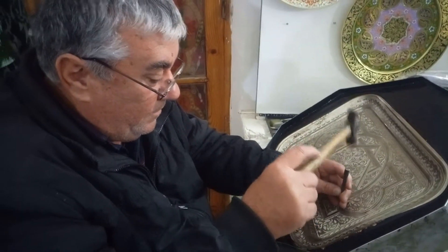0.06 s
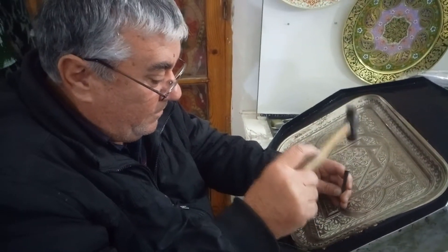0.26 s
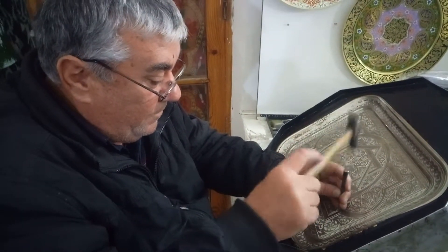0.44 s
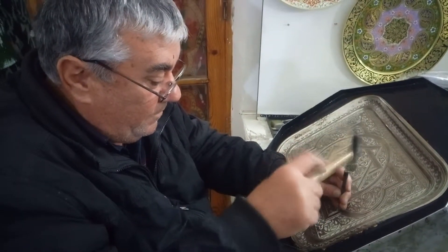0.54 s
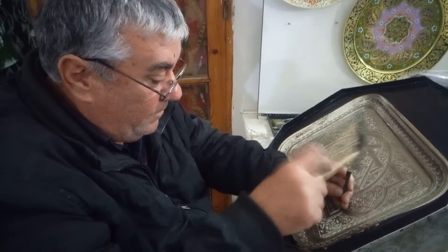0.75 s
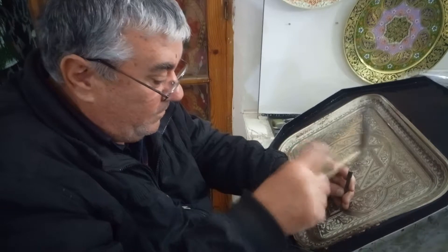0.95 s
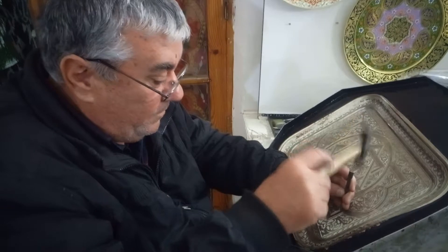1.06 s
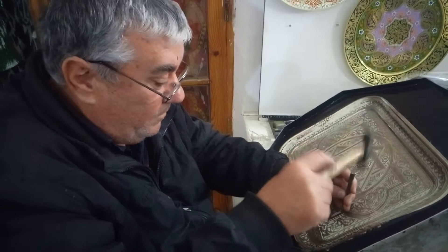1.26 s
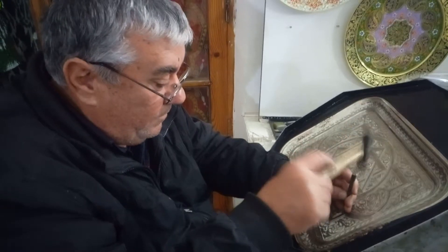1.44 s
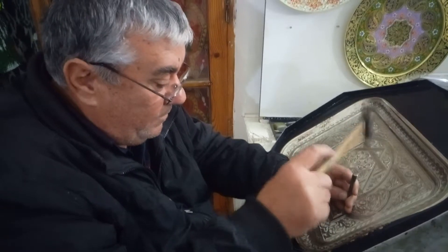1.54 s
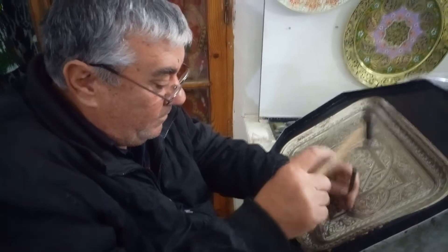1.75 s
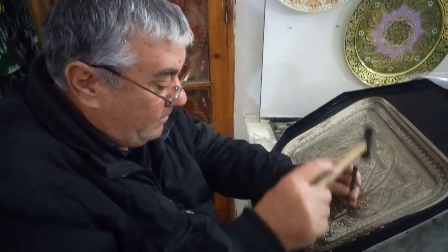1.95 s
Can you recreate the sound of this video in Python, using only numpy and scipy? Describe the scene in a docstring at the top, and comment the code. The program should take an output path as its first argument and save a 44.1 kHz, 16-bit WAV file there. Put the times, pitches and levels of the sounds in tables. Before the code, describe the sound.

A small hammer taps a punch against a metal tray seven times in a reverberant room.

```python
"""A reverberant room with a low rumble, one microphone close to a metal tray.
A small hammer taps a steel punch against the tray seven times, a little under five taps a second.
Each tap is a bright clink of steel and a short, falling clonk as the sheet bends; the tray thuds
softly as it is handled. The room answers late, with a long tail in which faint tones linger, and the
recorder's look-ahead limiter ducks that tail around every tap."""
import sys
import numpy as np
from scipy import signal
from scipy.fft import rfft, irfft
from scipy.io import wavfile
from scipy.ndimage import uniform_filter1d, minimum_filter1d

SR = 44100
rng = np.random.default_rng(int(sys.argv[2]) if len(sys.argv) > 2 else 0)


def persist_wave(psi):
    """Save psi, clipped to +-1, as 16-bit WAV."""
    counts = np.round(np.clip(psi, -1, 1) * 32767).astype(np.int16)
    wavfile.write(sys.argv[1], SR, np.atleast_2d(counts).T)


N = 88200

# The room's rumble and hiss. Each row: frequency in Hz, relative density in dB.
ROOM_TONE_SPECTRUM = [(18, -31.5), (30, 3.5), (106, 1.5), (194, -6), (239, -18.5), (287, -7.5), (394, -19),
                      (437, -13), (600, -20), (937, -17.5), (1160, -33), (1760, -32.5), (2610, -21.5),
                      (3870, -48), (6210, -45.5), (8520, -60.5), (16000, -59.5)]
# The hammer taps. Each row: start in seconds, strength in dB, then trims in dB for the clonk, the
# sheet's overtones, the steel modes and the punch's ping, and the ping's tilt in dB per kHz.
HAMMER_TAPS = [(0.2152, -5.5, -5.5, -4, 2.5, -0.5, -17), (0.4209, -4, 0, -5.5, 2, 2, 15.5),
               (0.6404, -1.5, 2, 2, 2, 6, 4), (0.856, 0, 1, -1.5, -1.5, 4.5, 3),
               (1.0715, -0.5, 0.5, -1.5, 0.5, 0.5, -8), (1.2821, -2, 1.5, 3, 3, -1.5, -5),
               (1.4813, -2, 1, 4.5, 0, -0.5, 7)]
# The crack of contact. Each row: frequency in Hz, relative density in dB.
CRACK_SPECTRUM = [(40, -31.5), (90, 10), (150, 8), (260, 5), (480, 4), (1000, 7), (1900, -5.5),
                  (2800, -1.5), (4200, -7), (6200, -1), (8200, -2.5), (10800, -12.5), (13000, -3),
                  (16000, -7.5)]
# The clank of a loosely seated punch. Each row: frequency in Hz, level in dB, t60 in seconds.
CLANK_MODES = [(2330, -24, .008), (4960, -24, .006), (5450, -23, .005), (6250, -24, .005)]
# The punch's very high ping. Each row: frequency in Hz, level in dB, decay time in seconds.
PING_MODES = [(14670, -10, 0.0018), (15360, -11, 0.00073), (15730, -12.5, 0.00083)]
# The clink of hammer and punch. Each row: frequency in Hz, level in dB, t60 in seconds.
STEEL_MODES = [(2238, -25.5, 0.045), (5710, -13, 0.037), (5890, -20.5, 0.022), (6440, -28, .03),
               (7030, -22, .03), (7350, -19.5, 0.023), (7960, -26.5, .03), (7940, -30, .03)]
# The sheet's short overtones. Each row: frequency in Hz, level in dB, t60 in seconds.
SHEET_OVERTONES = [(152, -34.5, 0.04), (334, -22, 0.048), (698, -21.5, 0.071), (1020, -34.5, 0.014),
                   (1489, -14, 0.026), (1596, -36, 0.047), (2710, -27.5, .04), (3081, -18, 0.044),
                   (3670, -33.5, .04)]
# Faint low and middle tones that linger in the room's tail. Each row: frequency in Hz, level in dB.
ROOM_RING_MODES = [(150, -33), (347, -36), (535, -44), (650, -33.5), (686, -40.5), (808, -33), (836, -32),
                   (906, -31.5), (954, -31), (1043, -35.5), (1176, -38.5)]
# The room's distinct echoes. Each row: delay in seconds, level in dB, low and high band edge in Hz.
ROOM_ECHOES = [(.0118, -15, 500, 1300), (.0205, -12, 500, 1300), (.0145, -20, 3000, 9500),
               (.029, -16, 4500, 9500), (.046, -18, 13000, 16500)]
# The room's diffuse tail. Each row: band frequency in Hz, level in dB, t60 in seconds.
ROOM_TAIL_BANDS = [(60, 0, 1), (150, 3.5, 0.58), (244, 1, 1), (343, 6.5, 1), (446, 3, 0.75),
                   (556, 7.5, 0.79), (753, -3.5, 1), (879, -2.5, 0.9), (1073, 3.5, .85), (1370, 5.5, 0.88),
                   (1950, 0.5, 0.79), (3090, 0, 0.74), (3650, -3, .66), (5340, -3, 0.51),
                   (6640, -3.5, 0.42), (7880, -8, 0.4), (10400, -10, 0.27), (15200, -13, 0.23)]
# Thuds of the handled tray. Each row: start in seconds, level in dB, pitch in Hz.
HANDLING_THUDS = [(0.545, -27.5, 97), (0.814, -23.5, 64.7), (1.03, -29, 66.3), (1.427, -21.5, 98),
                  (1.874, -30, 105.7)]


def undb(db):
    """Decibels to gain."""
    return 10 ** (np.asarray(db) / 20)


def along(hz, points, values):
    """Straight lines between points on a log-frequency axis."""
    return np.interp(np.log(np.maximum(hz, 1)), np.log(points), values)


def burst(t, rise_s, decay_s):
    """Smooth rise, then exponential decay."""
    rise = np.sin(np.pi / 2 * np.clip(t / rise_s, 0, 1)) ** 2
    return rise * np.exp(-np.maximum(t - rise_s, 0) / decay_s)


def add(out, start_s, x):
    """Mix a sound in at a time."""
    i = int(round(start_s * SR))
    out[i:i + len(x)] += x[:N - i]


def room_tone():
    """Steady rumble and faint hiss all around the microphone, at unit rms."""
    points, db = np.array(ROOM_TONE_SPECTRUM).T
    hz = np.fft.rfftfreq(N, 1 / SR)
    phases = np.exp(2j * np.pi * rng.random(len(hz)))
    rumble = irfft(undb(along(hz, points, db)) * phases, N)
    return rumble / rumble.std()


def contact_crack(t, grain, clonk_db):
    """Contact noise: a short burst with a smooth spectrum, whose lows follow the clonk."""
    body_hz = 1400
    points, db = np.array(CRACK_SPECTRUM).T
    hz = np.fft.rfftfreq(len(grain), 1 / SR)
    colour = undb(along(hz, points, db))
    colour /= np.sqrt(np.mean(colour ** 2))
    colour *= undb(clonk_db / 2 / (1 + (hz / body_hz) ** 2))
    grit = burst(t[:len(grain)], rise_s=0.0009, decay_s=0.0051) * grain
    phases = np.exp(1j * np.angle(rfft(grit)))  # the burst's timing without its ragged spectrum
    crack = irfft(colour * phases)[:len(grain) // 2]
    return undb(10) * np.pad(crack, (0, len(t) - len(crack)))


def sheet_clonk(t, clonk_db):
    """The sheet bends under the punch: a tone swells and falls until the support damps it."""
    end_hz, fall_s, swell_s, damp_s = 757, 0.004, 0.00964, 0.00082
    glide_hz = 377.5 * undb(0.56 * clonk_db)  # a stronger clonk falls further
    hz = end_hz + glide_hz * np.exp(-t / fall_s)
    swell = np.sqrt(np.minimum(t / swell_s, 1))
    damping = np.exp(-np.maximum(t - swell_s, 0) / damp_s)
    return undb(clonk_db - 7.5) * swell * damping * np.sin(2 * np.pi * np.cumsum(hz) / SR)


def choked_ring(t, modes):
    """Struck modes, a little different in pitch each tap, choked as the punch presses into the sheet."""
    rise_s, free_s, choke_s = 0.00038, 0.0077, 0.0017
    choke = np.minimum(t / rise_s, 1) * np.exp(-np.maximum(t - free_s, 0) / choke_s)
    tones = np.zeros(len(t))
    for k, (hz, db, t60) in enumerate(modes):
        detune_hz = rng.standard_normal() / t60
        tones += (-1) ** k * undb(db - 60 * t / t60) * np.sin(2 * np.pi * (hz + detune_hz) * t)
    return choke * tones


def punch_ping(t, tilt_db_per_khz):
    """Hammer on steel: a tight cluster of very high modes swells and dies within milliseconds."""
    rise_s = 0.0012
    centre_hz = np.mean([hz for hz, _, _ in PING_MODES])
    ping = np.zeros(len(t))
    for hz, db, decay_s in PING_MODES:
        gain = undb(db + tilt_db_per_khz * (hz - centre_hz) / 1000)
        ping += gain * burst(t, rise_s, decay_s) * np.cos(2 * np.pi * hz * (t - rise_s))
    return ping


def hammer_taps():
    """The taps close up, in two parts: the knock of the blow and the clink of briefly ringing modes."""
    t = np.arange(SR) / SR
    knock, clink = np.zeros(N), np.zeros(N)
    shared_grain = rng.standard_normal(4096)
    for start, db, clonk_db, overtone_db, steel_db, ping_db, tilt in HAMMER_TAPS:
        grain = np.sqrt(0.5) * (shared_grain + rng.standard_normal(4096))  # half new on each tap
        crack = contact_crack(t, grain, clonk_db)
        clonk = sheet_clonk(t, clonk_db)
        clank = undb(-2.8 * clonk_db) * choked_ring(t, CLANK_MODES)  # loose punch: less clonk, more clank
        ping = undb(ping_db) * punch_ping(t, tilt)
        steel = undb(steel_db) * choked_ring(t, STEEL_MODES)
        overtones = undb(overtone_db) * choked_ring(t, SHEET_OVERTONES)
        add(knock, start, undb(db) * (crack + clonk + clank + ping))
        add(clink, start, undb(db) * (steel + overtones))
    return knock, clink


def after_ring():
    """After each tap faint, steady tones linger in the room's tail, and the punch's shank rings thinly."""
    rise_s, room_t60_s, shank_t60_s, shank_hz = 0.019, 0.75, 0.33, 12062
    t, out = np.arange(SR) / SR, np.zeros(N)
    room = sum(undb(db) * np.sin(2 * np.pi * (hz * t + rng.random())) for hz, db in ROOM_RING_MODES)
    room *= burst(t, rise_s, room_t60_s / np.log(1000))
    shank = undb(-44) * np.sin(2 * np.pi * shank_hz * t)
    shank *= burst(t, rise_s, shank_t60_s / np.log(1000))
    for start, db, clonk_db, *_ in HAMMER_TAPS:
        add(out, start, undb(db + clonk_db) * (room + shank))
    return out


def even_out(tail):
    """Softens single resonances so that a tail sounds diffuse."""
    spectrum = rfft(tail, 2 * len(tail))
    power = np.abs(spectrum) ** 2 + 1e-12
    ripple = power / (np.abs(uniform_filter1d(power, size=120)) + 1e-12)
    return irfft(spectrum / ripple ** 0.4)[:len(tail)]


def room_reverb(x):
    """From further off: a few echoes and a dense tail that arrives late, holds and dies treble first."""
    predelay_s, build_s, plateau_s, early_gain = 0.019, 0.014, 0.056, undb(-13.5)
    t, hz = np.arange(SR) / SR, np.fft.rfftfreq(SR, 1 / SR)
    points, db, t60 = np.array(ROOM_TAIL_BANDS).T
    early = early_gain * np.minimum(t / predelay_s, 1)
    late = (1 - early_gain) * np.clip((t - predelay_s) / build_s, 0, 1)
    fading_s = np.maximum(t - predelay_s - plateau_s, 0)
    slowest_fade = undb(-60 * fading_s / t60.max())
    diffuse = rfft(even_out(rng.standard_normal(SR) * (early + late) * slowest_fade))
    response = np.zeros(SR)
    for k, share in enumerate(np.eye(len(points))):
        band = along(hz, points, share)
        extra_fade = undb(-60 * fading_s / t60[k]) / slowest_fade
        tail = irfft(diffuse * band, SR) * extra_fade * (1 - t ** 2)  # tapers to silence at one second
        response += undb(db[k]) * tail * np.sqrt(np.mean(band ** 2) / np.sum(tail ** 2))
    for delay_s, echo_db, low_hz, high_hz in ROOM_ECHOES:
        band_pass = signal.butter(2, [low_hz, high_hz], "band", fs=SR, output="sos")
        response += undb(echo_db) * signal.sosfilt(band_pass, signal.unit_impulse(SR, int(delay_s * SR)))
    return signal.fftconvolve(x, response)[:N]


def handling_thuds():
    """Soft low thuds as the tray is handled."""
    t, out = np.arange(SR // 4) / SR, np.zeros(N)
    envelope = burst(t, rise_s=0.0069, decay_s=0.0078)
    for start, db, hz in HANDLING_THUDS:
        add(out, start, undb(db) * envelope * np.sin(2 * np.pi * hz * t))
    return out


def limiter(x):
    """The recorder turns down just ahead of each peak, holds, and recovers at a steady rate."""
    threshold_db, ratio, release_db_per_s = -20, 2.97, 207
    ahead, hold, attack = int(0.022 * SR), int(0.0025 * SR), int(0.017 * SR)
    level_db = 10 * np.log10(np.abs(uniform_filter1d(x ** 2, size=88)) + 1e-12)
    cut_db = np.maximum(level_db - threshold_db, 0) * (1 - 1 / ratio)
    span = ahead + hold
    gain_db = minimum_filter1d(-cut_db, span, origin=hold - span // 2)
    recovery_db = release_db_per_s * np.arange(N) / SR
    gain_db = np.minimum.accumulate(gain_db - recovery_db) + recovery_db
    smooth_db = signal.fftconvolve(gain_db, np.ones(attack) / attack)[:N]
    return x * undb(smooth_db)


def scene():
    """At the microphone: the taps and the tray up close, the room's tail and rumble behind them."""
    knock, clink = hammer_taps()
    reverb = room_reverb(knock + undb(-11) * clink)
    return (knock + clink + reverb + after_ring() + handling_thuds() + undb(-45) * room_tone())[None]


def record(dry):
    """The mono recorder: low cut, limiter, then top cut."""
    low_cut_hz, top_cut_hz = 63, 15750
    low_cut = signal.butter(3, low_cut_hz, "high", fs=SR, output="sos")
    top_cut = signal.ellip(8, 0.2, 80, top_cut_hz, fs=SR, output="sos")
    limited = limiter(signal.sosfilt(low_cut, dry[0]))
    return signal.sosfilt(top_cut, limited)[None]


dry = scene()
out = record(dry)
persist_wave(out)
```